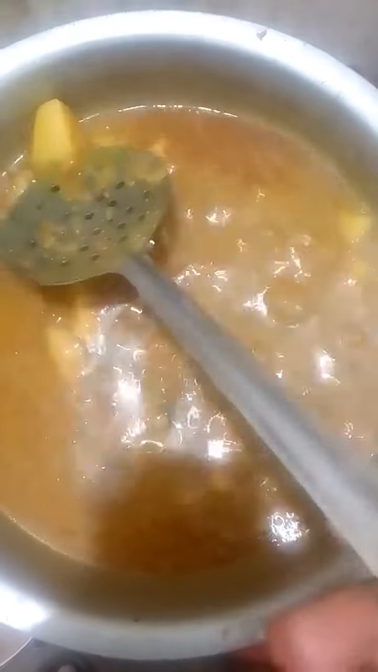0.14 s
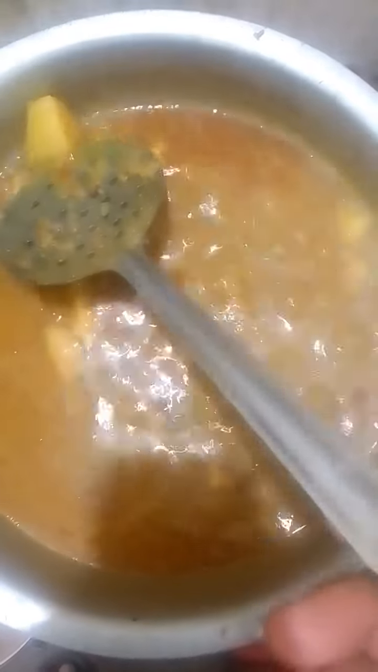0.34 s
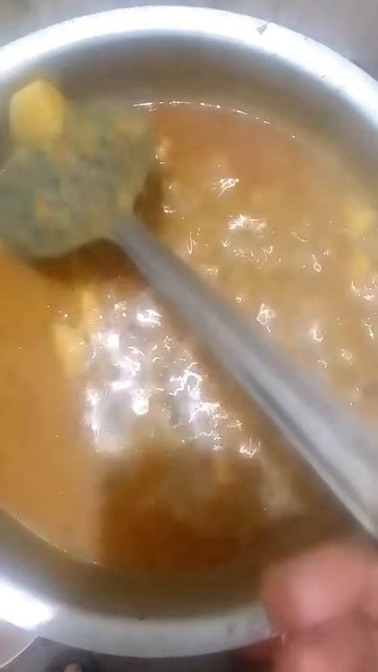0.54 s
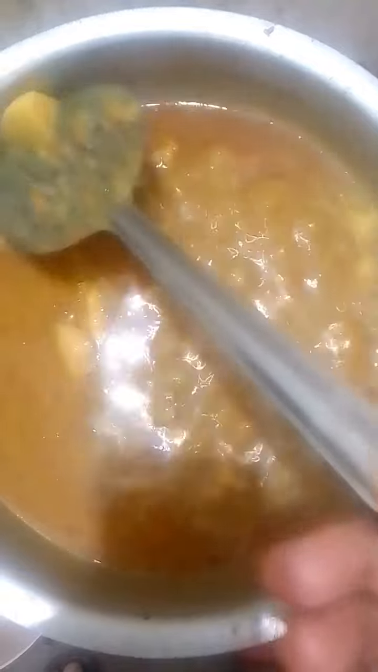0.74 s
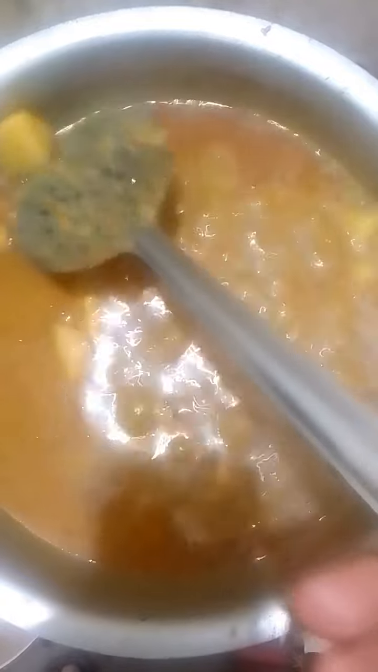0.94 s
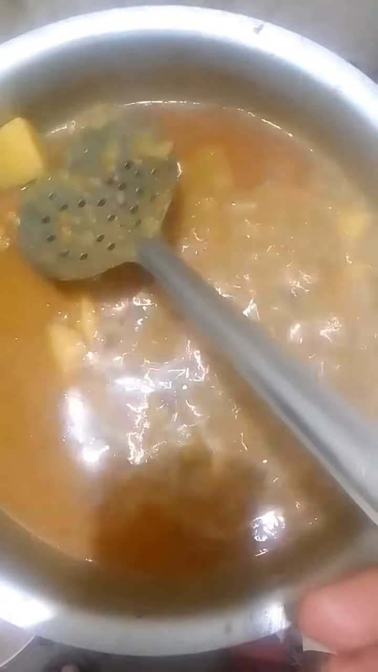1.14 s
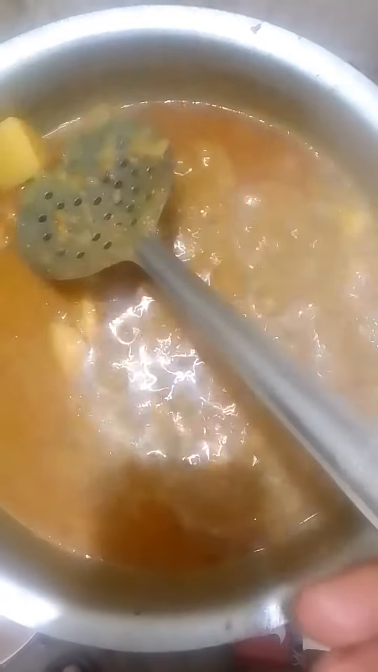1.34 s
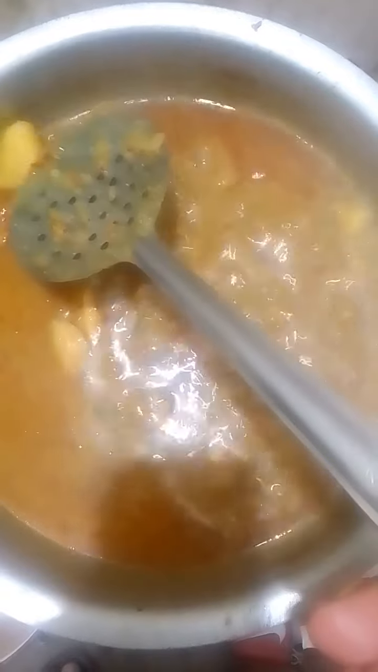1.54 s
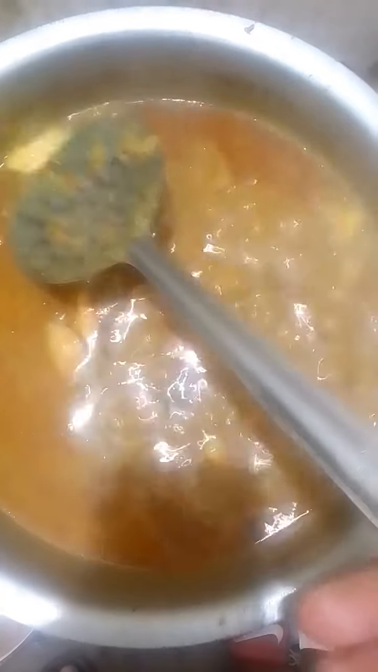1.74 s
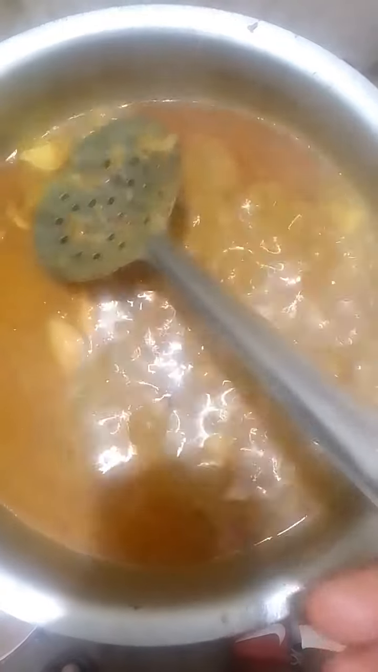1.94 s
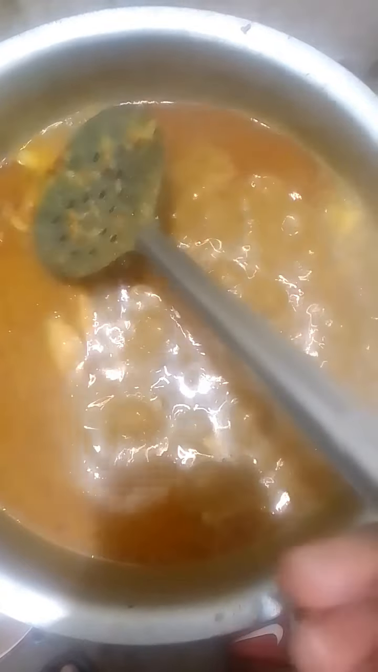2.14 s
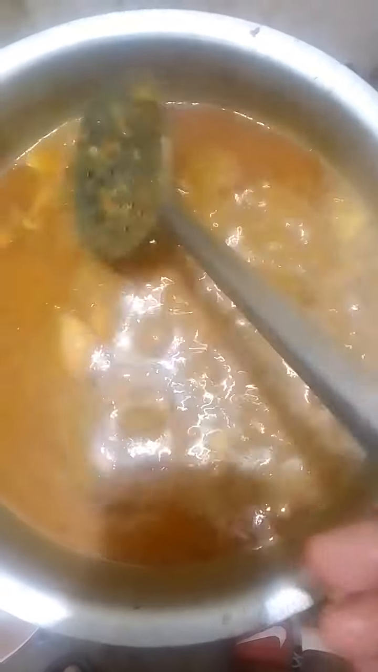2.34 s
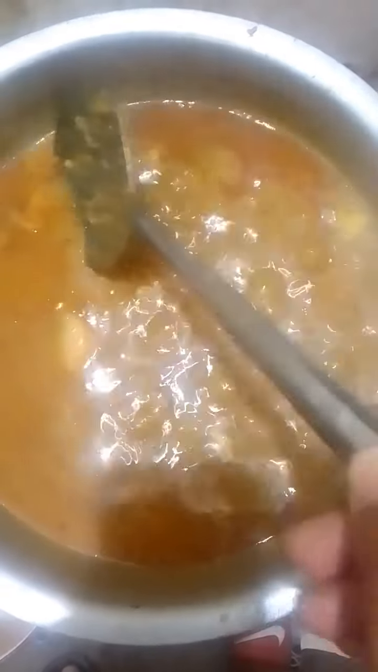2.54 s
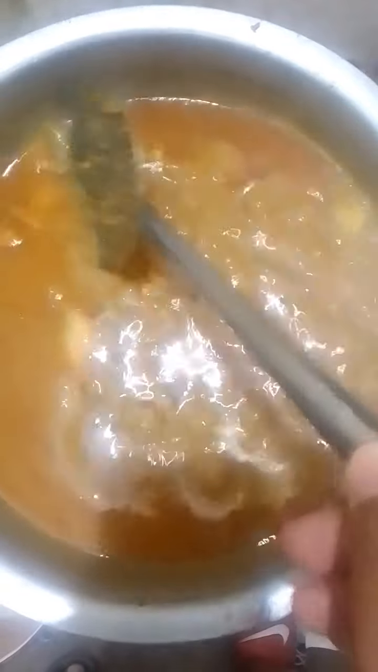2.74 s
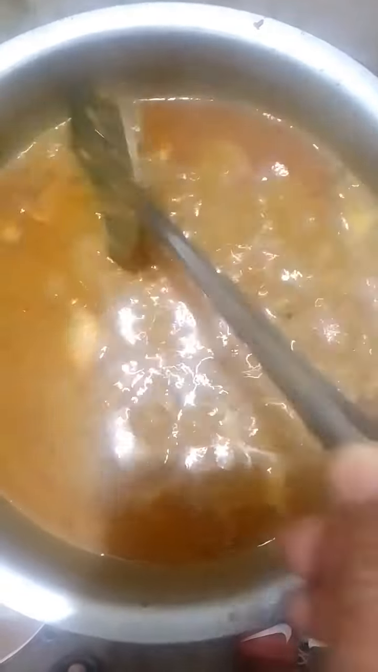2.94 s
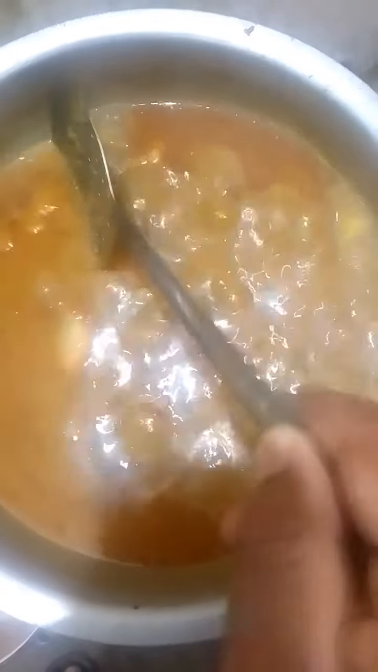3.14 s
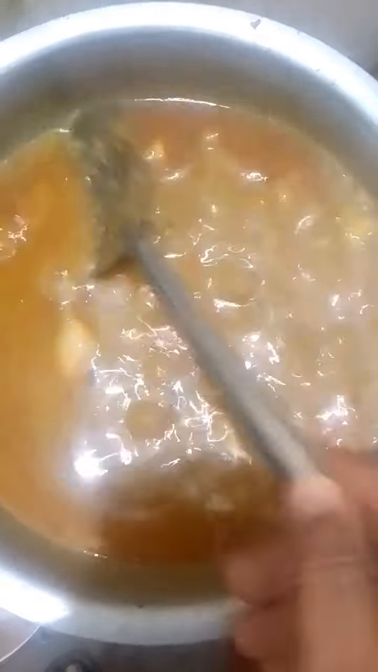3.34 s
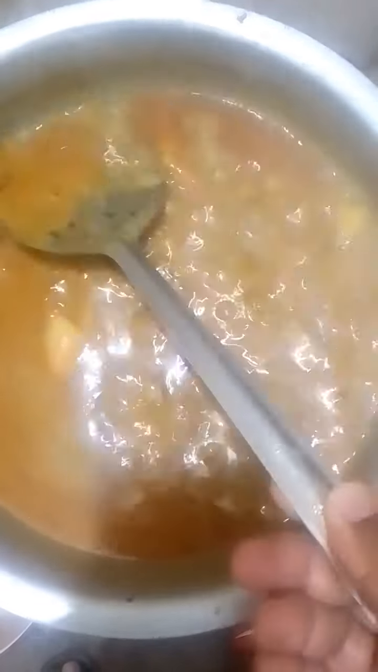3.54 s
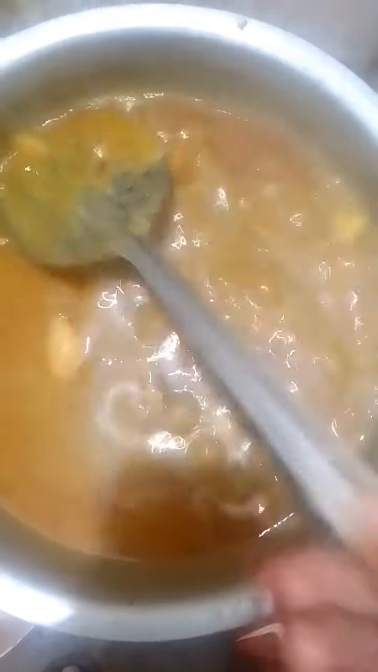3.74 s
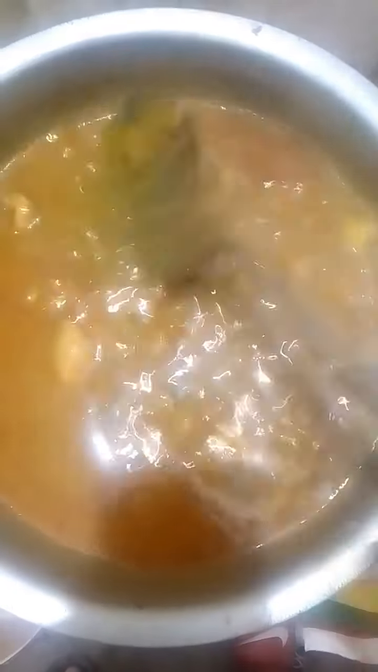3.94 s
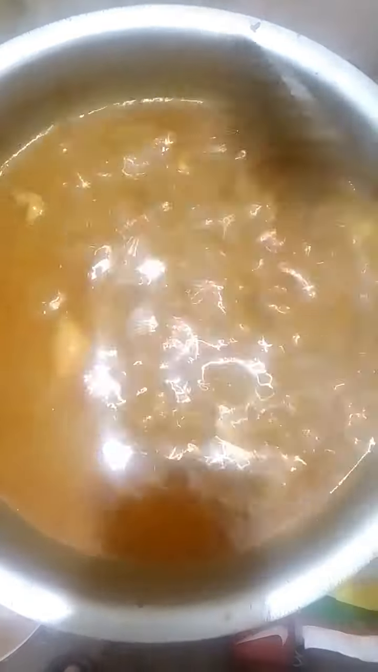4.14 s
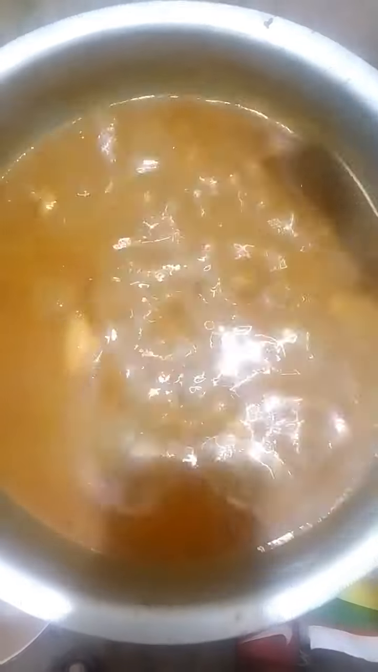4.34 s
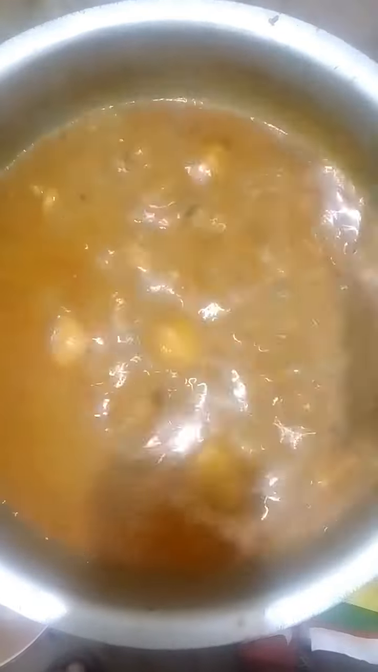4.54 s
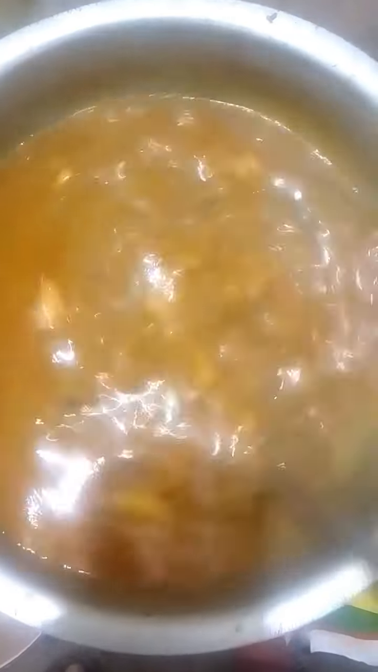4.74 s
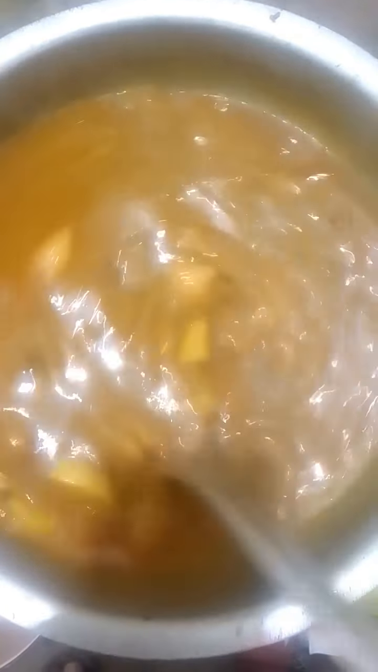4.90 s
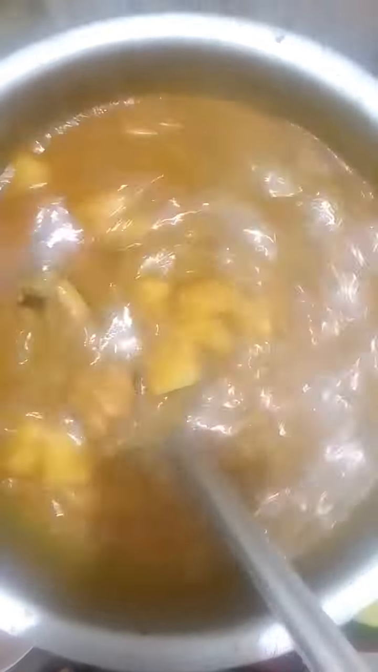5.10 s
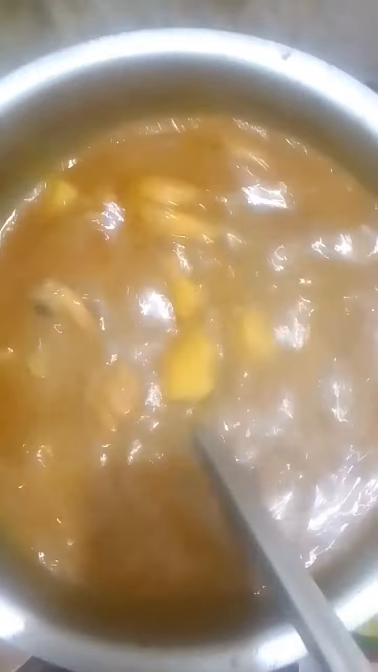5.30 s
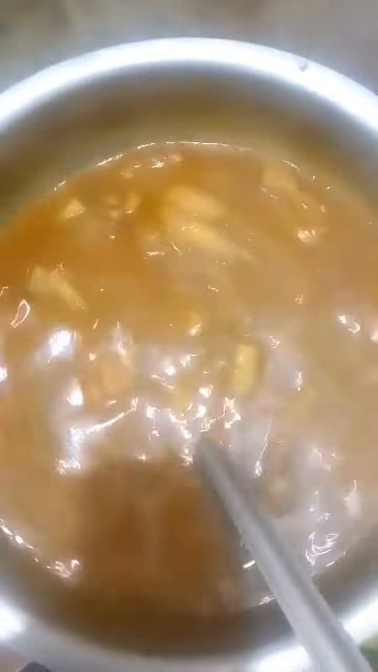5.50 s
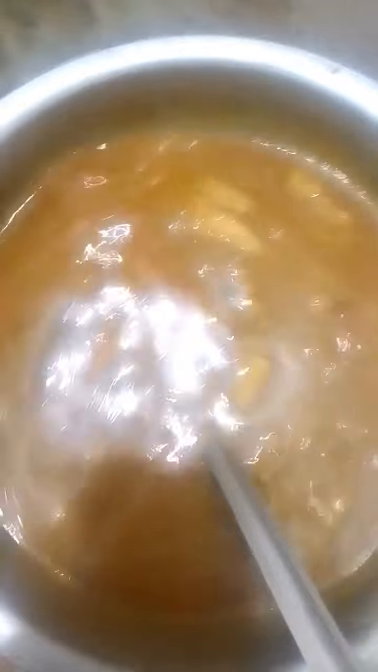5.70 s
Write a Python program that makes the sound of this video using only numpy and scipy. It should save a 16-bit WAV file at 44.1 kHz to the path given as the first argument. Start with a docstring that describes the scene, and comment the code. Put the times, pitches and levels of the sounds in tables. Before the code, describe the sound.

Fine, bright bubbling crackles throughout over faint kitchen hiss and low rumble. At first there are only small plops and brief metal grazes; then a scrape and thud, gurgling stirs, a long gritty scrape over the pot bottom, and sharp clacks with a short groan. Close microphone, small room with a short tail.

```python
"""Small kitchen, the microphone just above a metal pot in which thick curry simmers.
From the start tiny bubbles sizzle, snap and ping (random pops and short tones) over kitchen noise and
rumble; larger ones plop and the stirred broth sloshes (short tones that rise in pitch). A steel skimmer
nudges the food with grinding and ticks (coloured random impulses), then from about 3 s swirls the broth,
knocks on the pot (noise bursts, one with a hollow tone), scrapes at length across the bottom and groans once."""
import sys
import numpy as np
from scipy import signal
from scipy.fft import rfft, irfft
from scipy.io import wavfile
from scipy.ndimage import map_coordinates

SR = 44100
rng = np.random.default_rng(int(sys.argv[2]) if len(sys.argv) > 2 else 0)


def unload_audio(sound):
    """Save the sound as a 16-bit wav file, at the path given as the first command line argument."""
    columns = np.transpose(np.atleast_2d(sound))
    # keep every value between -1 and 1, then stretch to whole-number steps
    steps = np.round(np.clip(columns, -1, 1) * 32767)
    wavfile.write(sys.argv[1], SR, steps.astype(np.int16))


N = 253912
TIME = np.arange(N) / SR

# strength of the boil as it surges and eases: time_s, level_db
BOIL = [(0, -50.5), (.33, -55.5), (.63, -49), (.95, -54), (1.2, -50.5), (1.55, -53), (1.7, -50.5),
        (2.25, -51), (2.52, -54.5), (2.72, -51.5), (3.05, -50), (3.35, -52.5), (3.65, -48.5), (3.9, -52.5),
        (4.25, -47), (5.2, -50), (5.76, -50.5)]


def amp(db):
    """Decibels to gain."""
    return 10 ** (np.asarray(db) / 20)


def unit(x):
    """Scales to rms 1."""
    return x / np.sqrt(np.mean(x ** 2) + 1e-20)


def read(points, hz):
    """Reads a curve given by points, on a log-frequency axis."""
    f, value = np.transpose(points)
    return np.interp(np.log(hz + 1), np.log(np.sort(f) + 1), value)


def add(mix, s, sound):
    """Mixes a sound in at time s."""
    part = mix[max(round(s * SR), 0):][:len(sound)]
    part += sound[:len(part)]


def ring(points, size=4096):
    """Causal (minimum-phase) impulse response with the given spectrum, energy 1."""
    log_gain = np.log(amp(read(points, abs(np.fft.fftfreq(size, 1 / SR)))))
    spectrum = np.exp(np.conj(signal.hilbert(log_gain)))
    h = np.fft.ifft(spectrum).real[:size // 2]
    return h / np.linalg.norm(h)


def colour(x, points):
    """Passes x through a body with the given spectrum."""
    return signal.oaconvolve(x, ring(points))[:len(x)]


def drift(hz):
    """Smooth random wander of rms 1, its changes rolled off above hz."""
    spectrum = rfft(rng.standard_normal(N))
    rolloff = 1 + (np.fft.rfftfreq(N, 1 / SR) / hz) ** 4
    return unit(irfft(spectrum / rolloff, N))


def clicks(per_s, spread_db):
    """Random impulses of either sign, rms 1; spread_db sets how unequal their sizes are."""
    size = amp(spread_db * np.minimum(rng.exponential(1, N), 4))
    sign = rng.choice([-1, 1], N)
    return unit(size * sign * (rng.random(N) < per_s / SR))


def bend(x, factor):
    """Shifts all resonances of a steady texture by a moving factor."""
    return map_coordinates(x, [np.cumsum(factor)], order=3, mode="mirror")


def gesture(start, hold, rise_s, fade_db_per_s):
    """Envelope of one movement: it rises, holds until hold s after its start, then fades steadily."""
    age = TIME - start
    return np.clip(age / rise_s, 0, 1) * amp(-fade_db_per_s * np.maximum(age - hold, 0))


def kitchen():
    """Steady background of the place: coloured noise."""
    # background colour: pitch_hz, level_db
    kitchen_colour = [(20, -14), (65, -10), (120, -2), (160, -13), (330, 6), (480, 4), (750, 5.5),
                      (1050, 2.5), (1250, 4.5), (1500, 5.5), (3000, 7.5), (6000, -17), (12000, -20),
                      (15400, -16.5)]
    return amp(-64.5) * unit(colour(rng.standard_normal(N), kitchen_colour))


def sizzle(flurry_db=2.1, surge_db=-0.5):
    """Swarms of tiny bursting bubbles, coming in flurries, through one sharp resonance."""
    # colour of the sizzle: pitch_hz, level_db
    sizzle_colour = [(900, -45), (1850, -32.5), (2170, -15), (2400, -20), (3050, -19.5), (3170, -1),
                     (3245, 1.5), (3325, 3.5), (3420, -4), (3590, -5), (3720, -9.5), (4000, -21.5),
                     (4150, -25.5), (4500, -27.5), (5600, -46), (9000, -55.5)]
    flurries = amp(flurry_db * drift(hz=28.6) + surge_db * drift(hz=19))
    pops = clicks(per_s=2200, spread_db=0.5) * flurries
    level = amp(np.interp(TIME, *np.transpose(BOIL)) - 2.0)
    return level * unit(colour(pops, sizzle_colour))


def snaps():
    """Thin films break dry at the surface: a fine, sharp crackle over the sizzle."""
    # colour of a snap: pitch_hz, level_db
    snap_colour = [(500, -28.5), (1800, -14), (2600, -7), (3600, 4), (4300, -2.5), (5200, -14.5),
                   (6500, -30), (12000, -42)]
    level = amp(np.interp(TIME, *np.transpose(BOIL)) - 16.5)
    return level * unit(colour(clicks(per_s=160, spread_db=3.0), snap_colour))


def agitation():
    """Strength of slosh and rumble: powers add from the boil alone and every stir."""
    # moves of the skimmer that stir the broth and shake the pot: start_s, hold_s, slosh_db, rumble_db
    stirs = [(-.03, 0.3, -85, -65.5), (.48, 0.19, -66, -67.5), (1.027, 0.26, -68.5, -68),
             (2.704, 0.56, -59, -73.5), (3.103, 0.55, -57, -72), (3.834, 0.069, -59.5, -67.5),
             (4.317, 0.37, -55, -77), (4.882, 0.57, -60.5, -72)]
    swell_s, settle_db_per_s = 0.042, 61  # how fast the broth gets moving and comes to rest
    power = amp([[-69.5], [-83.5]]) ** 2  # slosh and rumble of the boil alone, dB
    for s, hold, slosh_db, rumble_db in stirs:
        move = gesture(s, hold, swell_s, settle_db_per_s)
        power = power + (amp([[slosh_db], [rumble_db]]) * move) ** 2
    return np.sqrt(power)


def slosh(cycles=2.77, glide=12, count=22):
    """The stirred broth gurgles: soft bubbles of many sizes, each a few rising cycles."""
    # strength of the broth's bubbles by pitch: pitch_hz, level_db
    broth_colour = [(190, -19.5), (260, 2), (345, 2.5), (450, -5), (560, 4), (760, 4.5), (1050, -0.5),
                    (1250, -22.5), (1500, -11)]
    out, t = np.zeros(N), np.arange(SR // 16) / SR
    for hz in np.geomspace(190, 1500, count):
        age = t * hz / cycles
        tone = np.sin(2 * np.pi * hz * t * (1 + glide * t / 2))
        bubble = unit(age * np.exp(-2 * age) * tone)
        swarm = signal.oaconvolve(clicks(per_s=50, spread_db=2.5), bubble)[:N]
        out += amp(read(broth_colour, hz)) * swarm
    return agitation()[0] * amp(-4) * unit(out)


def rumble():
    """The boil and the shifting food shake pot and stove: deep coloured noise."""
    # colour of pot and stove: pitch_hz, level_db
    rumble_colour = [(30, -32), (70, -30), (90, -19), (107, -5), (125, 0), (152, -21), (180, -2.5),
                     (210, -7.5), (255, 4.5), (330, 5), (400, -14.5), (800, -45)]
    return agitation()[1] * unit(colour(rng.standard_normal(N), rumble_colour))


def pressure(places=("wall", "bottom", "sunk")):
    """Strength of the grinding and of the edge's rasp: pushes at these places bite, hold, ease off."""
    # pushes of the skimmer along the metal, hold counted from the start:
    # start_s, bite_s, hold_s, grind_db, edge_db, easing_db_per_s, place
    pushes = [(.08, .02, 0.041, -71, -59, 76, "wall"), (1.112, 0.012, 0.085, -56.5, -57, 80, "wall"),
              (2.24, 0.0092, .02, -65, -62, 160, "wall"), (2.752, 0.031, 0.098, -71, -59.5, 49, "wall"),
              (3.128, 0.0059, 0.036, -47, -71, 27.5, "wall"),
              (3.462, 0.0065, 0.055, -51.5, -55.5, 65, "sunk"), (3.887, 0.032, .04, -64, -56, 110, "sunk"),
              (4.3, .005, 0.0098, -52.5, -44.5, 230, "wall"), (4.307, 0.035, 0.69, -47, -53, 100, "bottom"),
              (5.045, .03, 0.18, -53, -65, 54, "sunk"), (5.276, .003, .012, -49.5, -62, 230, "sunk"),
              (5.353, .004, .03, -48, -70, 120, "sunk")]
    power = 0
    for s, bite, hold, grind_db, edge_db, fade, place in pushes:
        if place in places:
            power = power + (amp([[grind_db], [edge_db]]) * gesture(s, hold, bite, fade)) ** 2
    return np.sqrt(power)


def scrape():
    """The skimmer sticks and slips over the metal: dull grinding and a brighter rasp from its edge."""
    # grinding along the wall: pitch_hz, level_db
    wall_colour = [(130, -50.5), (300, -3.5), (450, -9), (900, -3.5), (1100, -2), (1220, -14.5), (1340, -1),
                   (1470, -3.5), (1560, -6), (1650, -3), (1830, -16), (2050, 4), (2270, 2), (2530, -10),
                   (2770, 0.5), (2930, -9), (3200, 4.5), (3600, 5.5), (4300, -15), (6000, -53)]
    # grinding across the bottom: pitch_hz, level_db
    bottom_colour = [(140, -53), (260, -5), (345, -1.5), (460, -12), (750, 0.5), (1100, -7), (1230, -7),
                     (1340, -1.5), (1480, -3.5), (1580, -11), (1680, -5), (1850, -9.5), (2250, 1.5),
                     (2900, 1.5), (3400, 6.5), (3950, -2), (4300, -30), (6000, -44)]
    # grinding with the skimmer sunk in the broth: pitch_hz, level_db
    sunk_colour = [(140, -44), (300, -4), (720, -2), (1000, -5.5), (1200, -16), (1320, 4), (1440, -21),
                   (1660, 3.5), (1880, -13), (2060, 6.5), (2280, 7.5), (2530, -0.5), (2770, 7), (2920, 3),
                   (3400, 6.5), (3950, -1), (4300, -29), (6000, -57)]
    # rasp of the edge about its main resonance: pitch_hz, level_db
    edge_colour = [(2400, -23.5), (3200, -11.5), (3650, 5.5), (3830, -0.5), (4000, 1), (4130, -0.5),
                   (4250, -18.5), (4480, -8), (4750, -36), (5200, -38.5), (9000, -50), (15000, -54)]
    # that resonance, rising then falling as the skimmer sweeps round the pot: time_s, pitch_hz
    edge_pitch = [(4.2, 3940), (4.55, 4210), (5.03, 4285), (5.2, 4060), (5.5, 3930)]
    surfaces = {"wall": wall_colour, "bottom": bottom_colour, "sunk": sunk_colour}
    waver = 1 + 0.013 * drift(hz=7)  # broth loading the skimmer moves the resonances
    grind = 0
    for place, body in surfaces.items():
        texture = unit(colour(clicks(per_s=1800, spread_db=-0.2), body))
        grind = grind + pressure([place])[0] * bend(texture, waver)
    # the edge's resonances slide with the point of contact
    slide = np.interp(TIME, *np.transpose(edge_pitch)) / 4000
    rasp = bend(unit(colour(clicks(per_s=650, spread_db=6.0), edge_colour)), slide)
    grind = grind * amp(1.37 * drift(hz=40))
    return grind + pressure()[1] * rasp * amp(-0.1 + 1.1 * drift(hz=40))


def ticks():
    """Single hard slips of the skimmer's rim, and lesser ones at random while it is pushed."""
    # loudest ticks of metal catching on metal: start_s, peak_db
    tick_events = [(1.139, -37), (1.154, -35), (2.251, -37), (2.502, -38), (3.327, -31), (4.309, -31),
                   (4.48, -33), (4.536, -32), (4.881, -32), (5.125, -27)]
    out = np.zeros(N)
    # colour of a tick: pitch_hz, level_db
    tick = ring([(400, -30), (2000, -20), (2700, -9), (3400, 0), (4000, -11), (4700, -30),
                 (6000, -49), (15000, -55)])
    for s, db in tick_events:
        add(out, s, amp(db) * tick / abs(tick).max())
    # lesser catches, level relative to the edge's pressure
    catches = amp(-9) * pressure()[1] * clicks(per_s=47, spread_db=4.0)
    return out + signal.oaconvolve(catches, tick)[:N]


def pings(half_s=0.0025):
    """Single tiny bubbles swell and fade at the pitch of the sizzle."""
    # loudest pings, timed at the peak: peak_s, level_db, pitch_hz
    ping_events = [(.095, -41.5, 3260), (.584, -40.5, 3340), (1.0614, -36, 3270), (1.115, -35.5, 3270),
                   (1.898, -37, 3310), (2.748, -39, 3280), (3.024, -43, 3200), (3.05, -40, 3390),
                   (3.766, -41.5, 3360), (3.935, -40, 3430), (5.453, -34.5, 3355)]
    out, t = np.zeros(N), np.arange(-SR // 50, SR // 50) / SR
    swell = np.exp(-abs(t / half_s) ** 1.1)
    for s, db, hz in ping_events:
        add(out, s + t[0], amp(db) * swell * np.sin(2 * np.pi * hz * t))
    return out


def plops(rise_s=0.0014, decay_s=0.0028, glide=14, gain_db=1, count=2):
    """A large bubble opens: a few cycles that rise in pitch as its cavity shrinks. Smaller ones follow."""
    # loudest large bubbles, and at 4.924 s the hollow tone of a knock on the pot, made the same way;
    # level before gain_db: start_s, level_db, pitch_hz
    plop_events = [(.136, -52, 650), (.494, -43.5, 787), (.606, -48.5, 547), (1.048, -52.5, 637),
                   (1.066, -55, 1020), (1.163, -48.5, 820), (1.213, -43.5, 853), (1.632, -47, 980),
                   (2.238, -51.5, 910), (2.73, -42.5, 620), (2.771, -43.5, 803), (2.855, -43, 610),
                   (2.876, -43, 740), (3.062, -38.5, 706), (3.142, -33.5, 814), (3.558, -49, 576),
                   (3.579, -41, 907), (4.41, -40.5, 780), (4.452, -40, 1010), (4.536, -41.5, 730),
                   (4.597, -40.5, 670), (4.618, -40, 800), (4.645, -45, 765), (4.718, -41, 750),
                   (4.924, -37.5, 1310), (4.937, -43, 606), (4.974, -40, 1080), (5.087, -35.5, 692),
                   (5.275, -41.5, 810), (5.357, -36.5, 633)]
    after_s, after_db, after_pitch = 0.028, -11.5, 1.14  # latest delay, level, typical pitch ratio
    out, t = np.zeros(N), np.arange(SR // 20) / SR
    shape = (1 - np.exp(-(t / rise_s) ** 2)) * np.exp(-t / decay_s)
    shape = amp(gain_db) * shape / shape.max()
    turns = 2 * np.pi * t * (1 + glide * t / 2)
    for (s, db, hz), chances in zip(plop_events, rng.random((len(plop_events), count, 2))):
        add(out, s, amp(db) * shape * np.sin(hz * turns))
        for when, size in chances:
            follower = shape * np.sin(hz * after_pitch ** (2 * size) * turns)
            add(out, s + after_s * np.sqrt(when), amp(db + after_db) * follower)
    return out


def swirls(width_hz=130):
    """A hollow in the broth fills behind the skimmer, and its gurgle slides in pitch."""
    # broth closing behind the skimmer: start_s, length_s, level_db, first_hz, last_hz
    swirl_events = [(2.93, .13, -66, 420, 680), (3.64, .22, -66, 600, 460), (3.87, .2, -62, 1150, 930),
                    (5.37, .22, -64, 620, 450)]
    out = np.zeros(N)
    # makes each tone a narrow, restless resonance that comes in gulps
    flutter = unit(drift(hz=width_hz) * amp(3 * drift(hz=30)))
    for s, length, db, first_hz, last_hz in swirl_events:
        size = round(length * SR)
        pitch = np.geomspace(first_hz, last_hz, size)
        tone = np.sqrt(2) * np.sin(2 * np.pi * np.cumsum(pitch) / SR)
        add(out, s, amp(db) * np.sqrt(np.hanning(size)) * tone * flutter[round(s * SR):][:size])
    return out


def knocks(blow=9):
    """Each knock is one blow and a short chatter of contacts, heard as clack and duller thud."""
    # knocks on the pot, thud relative to clack, t60 of the chatter: start_s, level_db, thud_db, t60_s
    knock_events = [(3.136, -45, 7.5, 0.12), (3.216, -54.5, 8, 0.16), (3.467, -42, -12, 0.05),
                    (4.304, -45.5, -28, 0.18), (4.438, -40.5, -2, 0.1), (4.708, -44.5, 1, 0.06),
                    (4.925, -35.5, -7.5, 0.073), (4.976, -45, 3.5, 0.11), (5.016, -42, -2, 0.12),
                    (5.272, -41, -5.5, 0.06), (5.358, -41.5, -8, 0.072)]
    # the skimmer's clack: pitch_hz, level_db
    clack_colour = [(500, -24), (1320, 2.5), (1460, 1.5), (1660, -2.5), (1870, -11.5), (2200, -3),
                    (2530, 4.5), (2750, 1.5), (2950, 1.5), (3500, 8), (4000, 4.5), (4600, -10.5),
                    (5600, -31), (15000, -45)]
    # the pot's thud: pitch_hz, level_db
    thud_colour = [(120, -28.5), (300, -9), (550, 1), (900, 8), (1150, 1), (1420, 9), (1800, -4.5),
                   (3000, -33.5), (6000, -84)]
    out, t = np.zeros(N), np.arange(SR // 5) / SR
    for s, db, thud_db, t60 in knock_events:
        chatter = rng.standard_normal(len(t)) * amp(db - 60 * t / t60)
        chatter[0] = blow * amp(db)
        clack, thud = colour(chatter, clack_colour), colour(chatter, thud_colour)
        add(out, s, clack + amp(thud_db) * thud)
    return out


def groan(rough=0.2):
    """The rim judders on the pot: regular stick and slip makes one rough tone that sags in pitch."""
    start_s, length_s, level_db = 5.125, 0.16, -54.5
    first_hz, sag_hz_per_s = 740, 280
    age = np.clip(TIME - start_s, 0, length_s)
    level = amp(level_db) * np.sin(np.pi * age / length_s) * (1 + rough * drift(hz=40))
    return np.sqrt(2) * level * np.sin(2 * np.pi * np.cumsum(first_hz - sag_hz_per_s * age) / SR)


def steel(x, ring_db):
    """Whatever touches the pot also sets the modes of pot and skimmer ringing."""
    # ringing of pot and skimmer: pitch_hz, level_db, t60_s
    steel_modes = [(706, -9, .1), (790, -8, .06), (1337, -3, .1), (1470, -1, .08), (1698, -9, .08),
                   (2050, -8, .07), (2200, -5, .07), (2328, -4, .07), (2602, -5, .06), (2847, -5, .05),
                   (3623, 0, .05), (3964, 1, .05)]
    t = np.arange(SR // 4) / SR
    ringing = 0
    for hz, db, t60 in steel_modes:
        ringing = ringing + amp(db) * unit(amp(-60 * t / t60) * np.cos(2 * np.pi * hz * t))
    return x + amp(ring_db) * signal.oaconvolve(x, ringing / np.linalg.norm(ringing))[:N]


def room(x, wet_db):
    """Close walls return a short, dense tail: random echoes that die at each pitch's own rate."""
    # decay of the room: pitch_hz, t60_s
    decay_times = [(200, 0.28), (1000, 0.14), (4000, 0.23), (10000, 0.092)]
    taps = rng.choice([-1., 1.], SR // 2) * (rng.random(SR // 2) < 2500 / SR)
    taps[:SR // 250] = 0  # no echo in the first 4 ms
    hz, t, z = signal.stft(taps, SR, nperseg=256)
    decay = amp(-60 * t / read(decay_times, hz)[:, None])
    tail = signal.istft(z * decay, SR)[1]
    return x + amp(wet_db) * signal.oaconvolve(x, tail / np.linalg.norm(tail))[:N]


def scene():
    """Bubbles, broth and skimmer in the kitchen."""
    fizz = room(sizzle() + snaps() + pings(), wet_db=-11)
    broth = room(plops() + slosh() + swirls(), wet_db=-6.0)
    skimmer = room(steel(scrape() + knocks() + ticks(), ring_db=-22), wet_db=-10.5) + groan()
    # sources this small radiate little bass
    bass_cut = signal.butter(3, 170, "high", fs=SR, output="sos")
    pot = signal.sosfilt(bass_cut, fizz + broth + skimmer)
    return (pot + rumble() + kitchen())[None]


def record(dry):
    """The recorder's band limit: a steep low-pass at 15520 Hz."""
    lowpass = signal.firwin(801, 15520, window=("kaiser", 8), fs=SR)
    return signal.oaconvolve(dry, lowpass[None], "same")


dry = scene()
out = record(dry)
unload_audio(out)
```